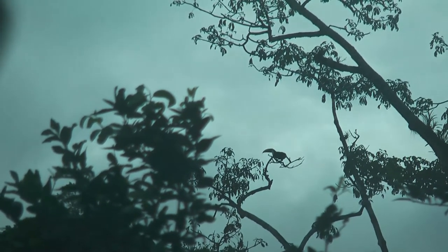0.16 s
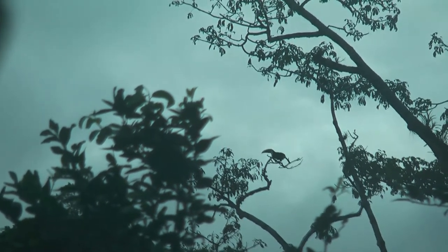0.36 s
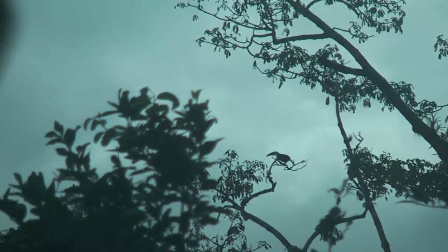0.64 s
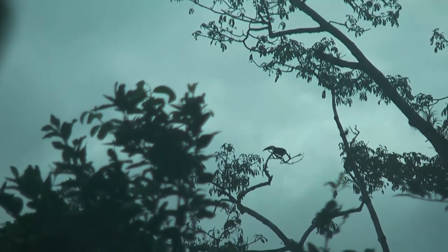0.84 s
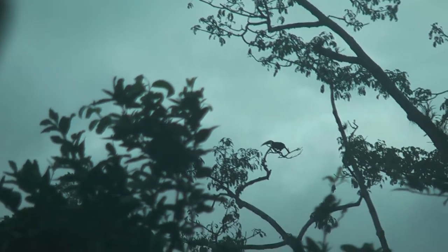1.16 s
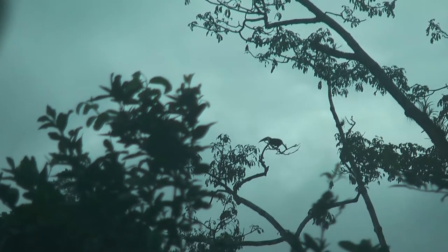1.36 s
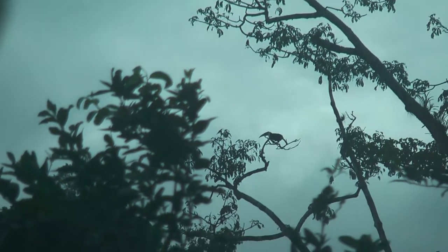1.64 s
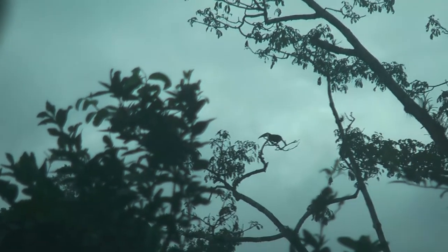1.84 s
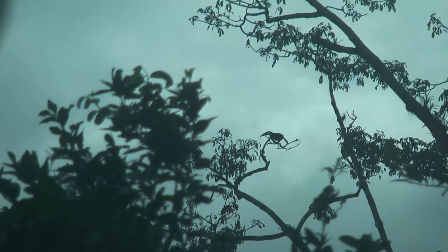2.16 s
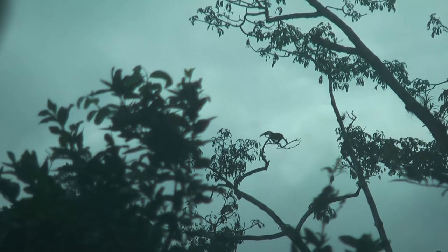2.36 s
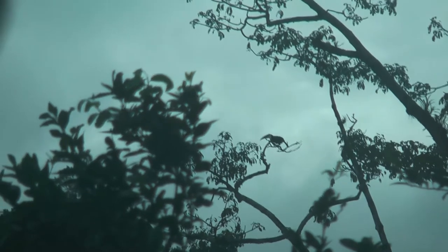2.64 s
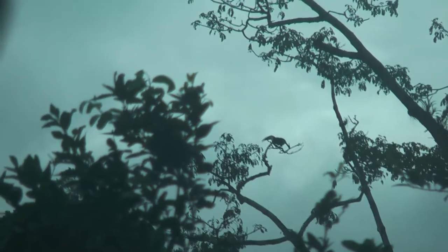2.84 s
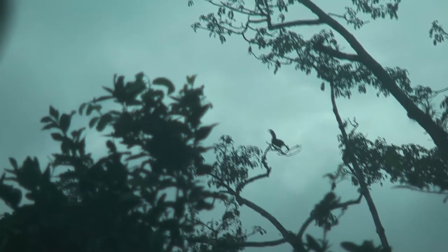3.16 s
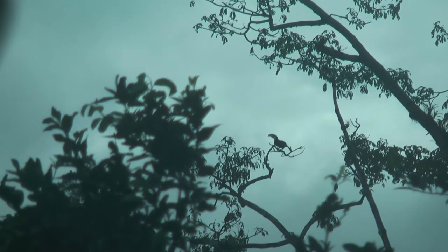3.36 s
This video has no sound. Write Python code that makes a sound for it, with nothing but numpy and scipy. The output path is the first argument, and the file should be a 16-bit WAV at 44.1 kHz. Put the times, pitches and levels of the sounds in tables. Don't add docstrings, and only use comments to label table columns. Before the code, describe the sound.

Layered high insects fill a dusk forest throughout, with a slow rasp swelling and fading; short bird whistle early, steady cicada buzz from the middle, stronger whistles at the end, distant microphone with hiss.

```python
import sys
import numpy as np
from scipy import signal
from scipy.fft import rfft, irfft
from scipy.io import wavfile
from scipy.ndimage import uniform_filter1d

SR = 44100
rng = np.random.default_rng(int(sys.argv[2]) if len(sys.argv) > 2 else 0)


def waveform_to_disk(signal):
    frames = np.transpose(np.atleast_2d(signal))
    scaled = np.clip(frames, -1, 1) * 32767
    samples = np.round(scaled).astype(np.int16)
    wavfile.write(sys.argv[1], SR, samples)


def makeup_ratio(level_db):
    decades = np.asarray(level_db, float) / 20
    return 10 ** decades


N = 154791
T = np.arange(N) / SR

# frequency in Hz, level in dB.
AIR_SPECTRUM = [(12, -36), (20, -13), (182, -8), (220, -9), (561, -5.5), (724, -8), (3200, -23),
                (4160, -71), (7040, -120)]
# frequency in Hz, level in dB.
HISS_SPECTRUM = [(2500, -50), (3200, -40), (5000, -14.5), (8900, -9.5), (9300, -2.5), (11000, -4),
                 (15800, -1.5)]
# centre in Hz, width in Hz, level in dB.
FAR_CHORUS = [(5434, 540, -68.5), (6043, 430, -60.5), (6307, 190, -58), (6766, 370, -59.5),
              (7650, 340, -57.5), (8155, 230, -58.5), (8484, 344, -58), (8990, 310, -84.5),
              (3860, 560, -69.5), (4570, 640, -76)]
# frequency in Hz, level in dB.
HUMS = [(463, -68), (554.5, -66), (840, -86), (974, -72), (1087, -72.5), (1986, -75), (2519, -77),
        (3311, -79)]
# frequency in Hz, likeness from 0 to 1.
MIC_LIKENESS = [(25, 1), (125, 0.12), (300, 0.42), (600, 0.41), (2000, 0.69), (5000, 0.76), (6500, 0.79),
                (8400, 0.48), (9300, 0.99)]
# frequency in Hz, level difference in dB.
MIC_TILT = [(40, 2), (150, -2), (550, -0.5), (1500, 4.5), (5000, -1), (8400, 1), (9300, -0.5)]

# start in seconds, end in seconds, level in dB.
RASP_PHRASES = [
    (-.3, .21, -58.5),
    (.24, .55, -71),
    (.62, .9, -68.5),
    (.95, 1.52, -59),
    (1.7, 2.1, -71.5),
    (2.22, 2.78, -59),
    (3.24, 3.87, -65),
]
# start pitch in Hz, end pitch in Hz, width in Hz, level in dB, delay in seconds.
RASP_BANDS = [(3540, 3600, 120, -7, 0), (3580, 3880, 230, 0, .1), (3850, 4220, 230, -1, .09)]
# start in seconds, end in seconds, level in dB.
CHIRP_PHRASES = [
    (-.1, .27, -55.5),
    (.68, 1.63, -57),
    (1.84, 1.95, -55),
    (2.02, 3.15, -57.5),
    (3.25, 3.5, -66),
]
BUZZ_PHRASES = [
    (-.1, .125, -60),
    (.18, .88, -63),
    (.94, 1.26, -60),
    (1.31, 1.85, -59.5),
    (1.9, 2.1, -64),
    (2.15, 2.6, -62),
    (2.62, 3.6, -68),
]
SHRILL_PHRASES = [
    (-.1, .3, -61),
    (.35, .72, -62),
    (.77, 1.28, -62),
    (1.63, 1.76, -64),
    (1.9, 2.2, -63),
    (2.28, 2.4, -58),
    (2.5, 3.2, -62),
    (3.3, 3.42, -58),
]
LOW_PHRASES = [
    (-.1, .56, -78),
    (1.2, 1.75, -81),
]
TRILL_PHRASES = [
    (-.06, .165, -53),
    (.52, .74, -51.5),
    (1.5, 1.71, -52),
    (2.29, 2.5, -52.5),
    (2.84, 3.05, -52.5),
]
PIP_PHRASES = [
    (.25, 3.6, -78),
]
SIDE_PHRASES = [
    (.55, .8, -63),
    (.85, 1.6, -69),
    (1.9, 3.3, -63),
]
FAINT_PHRASES = [
    (.62, 1.08, -75),
    (1.45, 1.82, -75),
    (2.2, 2.62, -73),
    (3.25, 3.6, -69.5),
]
# frequency in Hz, level in dB.
KATYDID_SPECTRUM = [(9500, -29), (11500, -6), (13500, -2.5), (15800, -1)]

# time in seconds, pitch in Hz, level in dB, lift of the upper tones in dB.
CALL_SOFT = [
    (.879, 1450, -74, 10),
    (.886, 1433, -53, 9.5),
    (.9, 1367, -56, 7.5),
    (.908, 1370, -64, 8),
]
CALL_FALLING = [
    (.977, 1590, -56, 7.4),
    (.988, 1588, -41.5, 6.9),
    (.999, 1573, -41.5, 7.5),
    (1.008, 1520, -50, 12),
    (1.02, 1474, -53, 9.7),
    (1.035, 1386, -51.5, 4),
    (1.048, 1290, -66, 2),
]
CALL_LONG = [
    (3.208, 1630, -59, 7),
    (3.216, 1674, -50.5, 10),
    (3.238, 1710, -42.5, -5.5),
    (3.266, 1717, -41.5, -6),
    (3.284, 1586, -38.5, -1.5),
    (3.302, 1481, -38, -6.5),
    (3.35, 1469, -44.5, 2),
    (3.382, 1464, -40.5, -1.5),
    (3.392, 1430, -48, -4),
]
CALL_FLUTTERED = [
    (3.393, 1450, -49, -2),
    (3.406, 1416, -38, -4.5),
    (3.42, 1446, -43, 0),
    (3.434, 1460, -51, -5),
    (3.452, 1434, -45, -5.5),
    (3.463, 1460, -56, -6),
]
CALL_LAST = [
    (3.492, 1575, -53, -1),
    (3.502, 1585, -45, -2.5),
    (3.52, 1576, -31, 0),
]
BIRD_TONES_DB = [0, -7, -36]
CALL_ECHO_DB = [
    -3,
    0.1,
    -7,
    -5,
    -3,
]

# time in seconds, level in dB, steadiness from 0 to 1.
CICADA_EFFORT = [(1.25, -72, .2), (1.5, -49.5, .3), (1.7, -55, .6), (1.85, -50.5, .93), (2.25, -51.5, .97),
                 (2.32, -51, .3), (2.48, -50, .6), (2.6, -49, .75), (2.7, -49.5, .95), (3.1, -49.5, .9),
                 (3.3, -51, .7), (3.52, -50.5, .6)]
# early level in dB, late level in dB.
CICADA_OVERTONES = [(-15, -27), (-3, -18), (-2, -12), (3.5, 6), (-12, -10), (-1.5, -9), (-24, -11), (4, 3),
                    (-17, -5), (-14, -15), (-15, -25)]
# time in seconds, clicks per second.
CICADA_CLICK_RATE = [(1.5, 148.4), (2.2, 147.45), (2.64, 146.87), (3.08, 146.44), (3.5, 146.2)]

# low edge in Hz, high edge in Hz, muted share of time in percent.
MUTED_BANDS = [(9000, 9650, 82), (9650, 9950, 35), (9950, 10250, 22), (10250, 10700, 5)]


def read(points, hz):
    f, value = np.transpose(points)
    return np.interp(np.log(hz + 1), np.log(f + 1), value)


def evened(x):
    return x / np.sqrt(np.mean(abs(x) ** 2) + 1e-20)


def wobble(width_hz):
    r = np.exp(-np.pi * abs(width_hz) / SR)
    z = rng.standard_normal(N) + 1j * rng.standard_normal(N)
    once = signal.lfilter([1], [1, -r], z)
    return evened(signal.lfilter([1], [1, -r], once))


def swing(hz):
    return np.exp(2j * np.pi * np.cumsum(hz * np.ones(N)) / SR)


def placed(x, pan_db):
    return x * makeup_ratio(np.array([[.5], [-.5]]) * pan_db)


def phrases(rows, edge_s=.022, fade_s=.022):
    gain, age_s = np.zeros(N), np.zeros(N)
    for start_s, end_s, db in rows:
        ramp = np.minimum((T - start_s) / edge_s, (end_s - T) / fade_s)
        gain += makeup_ratio(db) * np.clip(ramp, 0, 1)
        age_s = np.where(T >= start_s, T - start_s, age_s)
    return gain, age_s


def strokes(per_s, first_s, duty):
    turn = (T - first_s) * per_s + .5 + 0.05 * wobble(6.6).real
    size = makeup_ratio(.8 * rng.standard_normal(400))[turn.astype(int)]
    place = (turn % 1 - .5) / np.clip(duty, .05, 1)
    return size * np.cos(np.pi * np.clip(place, -.5, .5)) ** 2


def insect(rows, hz, per_s, duty, rough_hz, pan_db, first_s=0, rise_hz=0, pure=1.1, edge_s=.022, blur=0):
    gain, age_s = phrases(rows, edge_s)
    pitch_hz = hz - rise_hz * np.clip(1 - age_s / .08, 0, 1)
    ring = (swing(pitch_hz) * (pure + wobble(rough_hz))).real
    return placed(gain * evened((blur + strokes(per_s, first_s, duty)) * ring), pan_db)


def forest(x, t60_s):
    t = np.arange(SR // 2) / SR
    hit = rng.random((3, len(t))) < .05
    taps = rng.standard_normal((3, len(t))) * hit * makeup_ratio(-60 * t / t60_s) * (t > .006)
    taps = taps[0] + .9 * taps[1:]
    return signal.fftconvolve(x[None], taps / np.linalg.norm(taps[0]), axes=1)[:, :N]


def background():
    air_db, hiss_db, patch_db, hum_width_hz = -55.5, -68.5, 1.5, 9
    frames, hz = N // 256 + 5, np.fft.rfftfreq(1024, 1 / SR)
    a, b, c, d, patch = rng.standard_normal((frames, 513, 5)).T
    patch = evened(uniform_filter1d(uniform_filter1d(patch, 5, 0), 14, 1))

    def unit(shape):
        return shape / shape.sum()

    air = makeup_ratio(2 * air_db) * unit(makeup_ratio(2 * read(AIR_SPECTRUM + [(3600, -80)], hz)))
    hiss = makeup_ratio(2 * hiss_db) * unit(makeup_ratio(2 * read(HISS_SPECTRUM, hz)) * (hz < 15900))
    far = sum(makeup_ratio(2 * db) * unit(np.exp(-4 * ((hz - f) / w) ** 2)) for f, w, db in FAR_CHORUS)
    power = air + hiss
    mag = np.sqrt(power[:, None] + far[:, None] * makeup_ratio(2 * patch_db * patch))
    same = np.clip(read(MIC_LIKENESS, hz), 0, 1)[:, None]
    left = a + 1j * b
    right = same * left + np.sqrt(1 - same ** 2) * (c + 1j * d)
    z = np.array([left, right]) * mag
    z *= makeup_ratio(np.array([[.5], [-.5]]) * read(MIC_TILT, hz))[:, :, None]
    noise = evened(signal.istft(z, nperseg=1024, noverlap=768)[1][:, :N])
    hums = sum(makeup_ratio(db) * (swing(f) * (0.94 + wobble(hum_width_hz))).real * 0.89 for f, db in HUMS)
    return noise * np.sqrt((power + far).sum()) + hums


def katydid():
    teeth_per_s, level_db, grows_db_per_s, steady = 900, -67.5, 1, 0.48
    teeth = rng.standard_normal(N) * (1 + 1.9 * (rng.random(N) < teeth_per_s / SR))
    bursts = np.sqrt(strokes(per_s=20.04, first_s=0.032, duty=.42))
    z = rfft(teeth * (steady + bursts))
    shape = makeup_ratio(read([(8500, -70)] + KATYDID_SPECTRUM, np.fft.rfftfreq(N, 1 / SR)))
    return makeup_ratio(level_db + grows_db_per_s * T) * evened(irfft(z * shape, N))


def rasp():
    depth = 0.5
    gain, age_s = phrases(RASP_PHRASES, edge_s=0.053, fade_s=0.1)
    up = np.clip(age_s / .5, 0, 1)
    body = 0
    for from_hz, to_hz, width_hz, db, delay_s in RASP_BANDS:
        joined = np.clip((age_s - delay_s) / 0.12, 0, 1)
        ring = (swing(from_hz + (to_hz - from_hz) * up) * (0.65 + wobble(width_hz))).real
        body = body + makeup_ratio(db) * joined * ring
    beat = 1 - depth + depth * strokes(per_s=40, first_s=0, duty=0.96)
    return placed(gain * evened(body * beat), 3.1)


def chirper():
    return insect(CHIRP_PHRASES, 8338, 27.8, .8, 45, 5, first_s=.014, pure=1.8, blur=.05)


def buzzer():
    return insect(BUZZ_PHRASES, 7360, 72.3, .24, 45, -3, pure=2)


def shriller():
    return insect(SHRILL_PHRASES, 7720, 42, .85, 80, -2, pure=.8)


def low_cricket():
    return insect(LOW_PHRASES, 5340, 50, .9, 90, 0, pure=.3, blur=1)


def triller():
    return insect(TRILL_PHRASES, 5990, 70.5, .95, 80, .5, rise_hz=230, pure=1.3, edge_s=.09, blur=.12)


def piper():
    return insect(PIP_PHRASES, 5460, 6.52, .4, 30, 0, first_s=.04, pure=3.5, blur=.1)


def side_cricket():
    return insect(SIDE_PHRASES, 8150, 58, .8, 50, 2, pure=1.2)


def faint_cricket():
    return insect(FAINT_PHRASES, 4660, 45, .9, 260, 1, pure=0, edge_s=.1, blur=2)


def whistle():
    start_s, length_s, low_hz, top_hz, level_db = .74, .47, 9000, 10700, -76
    arch = np.sin(np.pi * np.clip((T - start_s) / length_s, 0, 1))
    return makeup_ratio(level_db) * arch ** .3 * swing(low_hz + (top_hz - low_hz) * arch ** 1.2).real


def bird():
    out = np.zeros((2, N))
    calls = CALL_SOFT, CALL_FALLING, CALL_LONG, CALL_FLUTTERED, CALL_LAST
    for call, echo_db in zip(calls, CALL_ECHO_DB):
        s, hz, db, lift_db = np.transpose(call)
        z, lift_db = swing(np.interp(T, s, hz)), np.interp(T, s, lift_db)
        tone = sum(makeup_ratio(d + lift_db * (k - 1)) * (z ** k).real for k, d in enumerate(BIRD_TONES_DB, 1))
        gain = uniform_filter1d(makeup_ratio(np.interp(T, s, db, left=-120, right=-120)), size=130)
        flutter = abs(1 + .14 * wobble(70))
        out += makeup_ratio(np.array([[0], [echo_db]])) * gain * tone * flutter
    return out


def bird_in_trees():
    song, sent = bird()
    dull = signal.lfilter(*signal.butter(3, 2000, fs=SR), sent)
    near = makeup_ratio(-2) * forest(sent, t60_s=.16)
    far = makeup_ratio(-2.5) * forest(dull, t60_s=1.7)
    return placed(song, 4) + near + far


def cicada():
    lowest_multiple, turn_s = 39, 2.45
    hiss_bands = [(6195, 550, -1.3), (6620, 280, -0.58)]  # Hz, width Hz, dB
    s, db, steady = np.transpose(CICADA_EFFORT)
    turn = np.cumsum(np.interp(T, *np.transpose(CICADA_CLICK_RATE))) / SR
    late = np.clip((T - turn_s) / 0.14 + .5, 0, 1)
    comb = 0
    for k, (early_db, late_db) in enumerate(CICADA_OVERTONES, lowest_multiple):
        line = (np.exp(2j * np.pi * k * turn) * (1 + .2 * wobble(3))).real
        comb = comb + makeup_ratio(early_db + (late_db - early_db) * late) * line
    hiss = sum(makeup_ratio(d) * (swing(f) * wobble(w)).real for f, w, d in hiss_bands)
    share = np.clip(np.interp(T, s, steady), 0, 1)
    voice = np.sqrt(share) * evened(comb) + np.sqrt(1 - share) * evened(hiss)
    return placed(makeup_ratio(np.interp(T, s, db, left=-99)) * voice, 0)


def scene():
    bugs = rasp() + chirper() + buzzer() + shriller() + low_cricket()
    bugs = bugs + triller() + piper() + side_cricket() + faint_cricket()
    drone = cicada()
    echoes = makeup_ratio(-8) * forest(bugs.mean(0) + .4 * drone.mean(0), t60_s=0.5)
    return background() + katydid() + bugs + whistle() + bird_in_trees() + drone + echoes


def top_cut(x):
    return signal.sosfilt(signal.butter(12, 16290, fs=SR, output="sos"), x)


def record(dry):
    edge_hz = 15790
    hz, _, z = signal.stft(dry, SR, nperseg=2048)
    keep = np.ones(z.shape[1:]) * (hz < edge_hz)[:, None]
    for low_hz, high_hz, percent in MUTED_BANDS:
        band = (hz >= low_hz) & (hz < high_hz)
        power = uniform_filter1d((abs(z[:, band]) ** 4).mean((0, 1)), size=2)
        keep[band] = power > np.percentile(power, percent)
    mix = signal.istft(z * keep, SR, nperseg=2048)[1][:, :N]
    return top_cut(mix)


dry = scene()
out = record(dry)
waveform_to_disk(out)
```